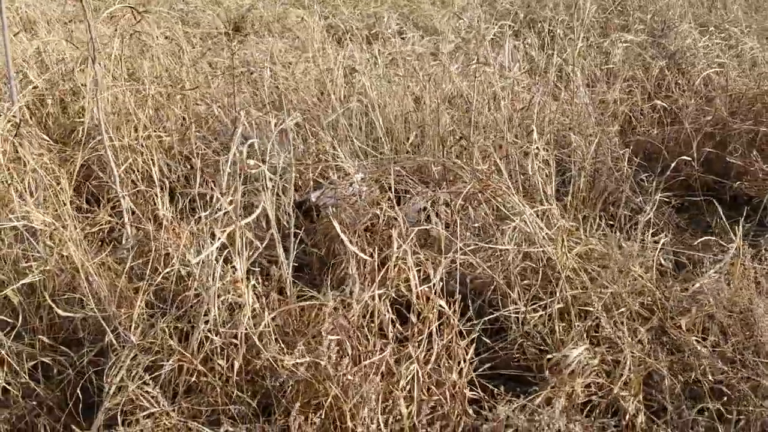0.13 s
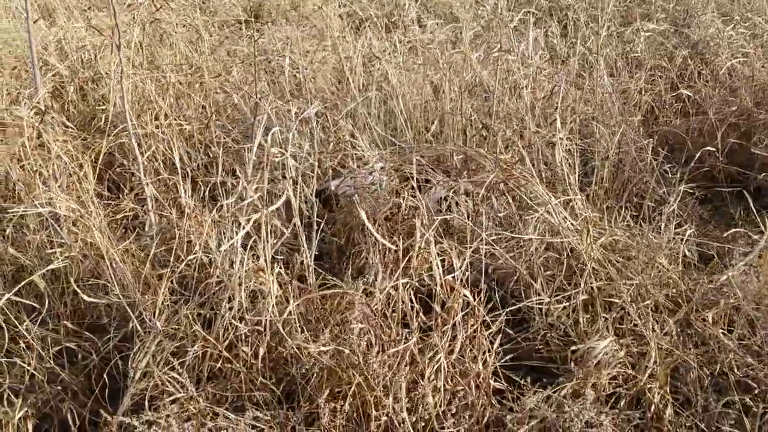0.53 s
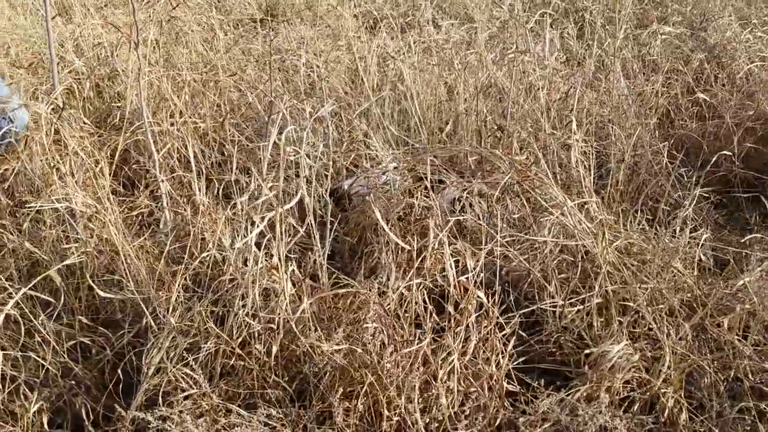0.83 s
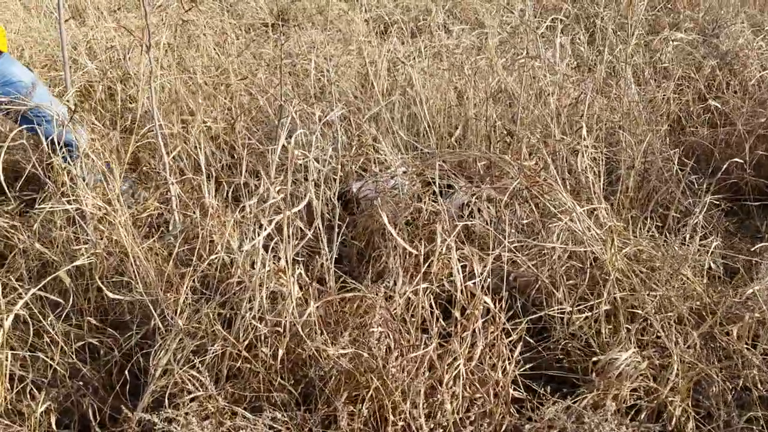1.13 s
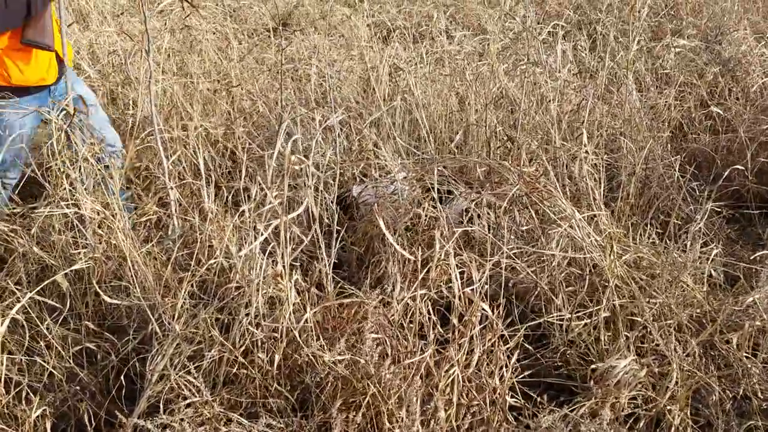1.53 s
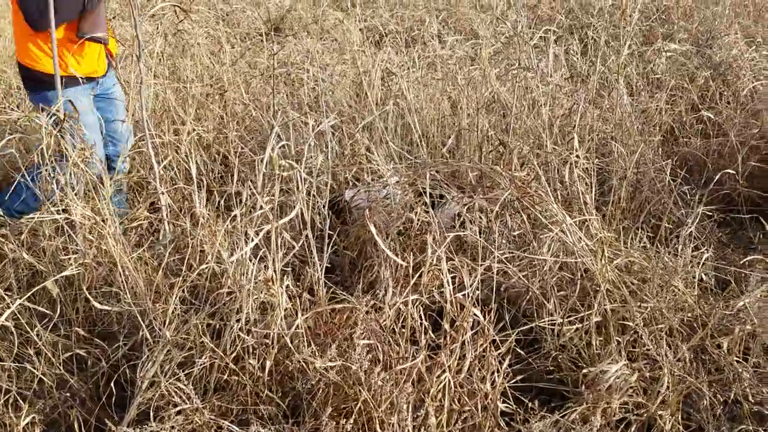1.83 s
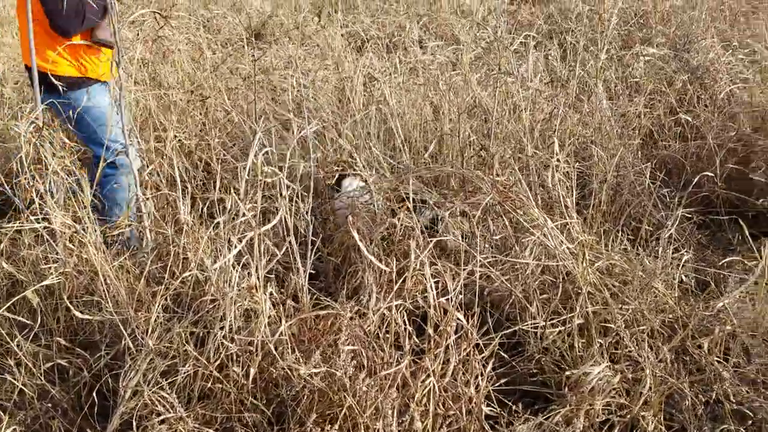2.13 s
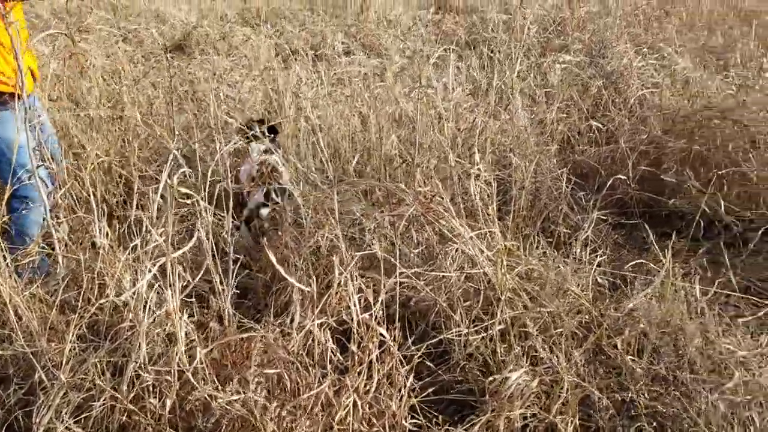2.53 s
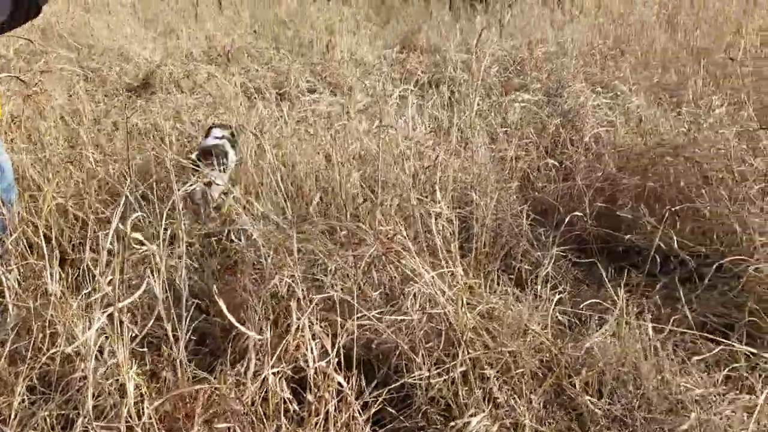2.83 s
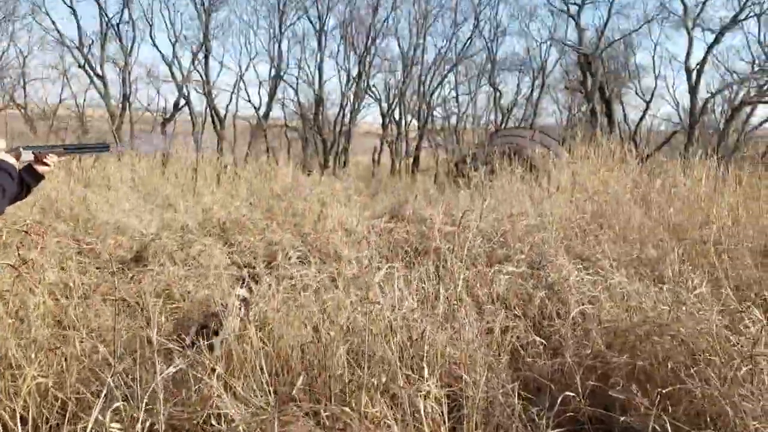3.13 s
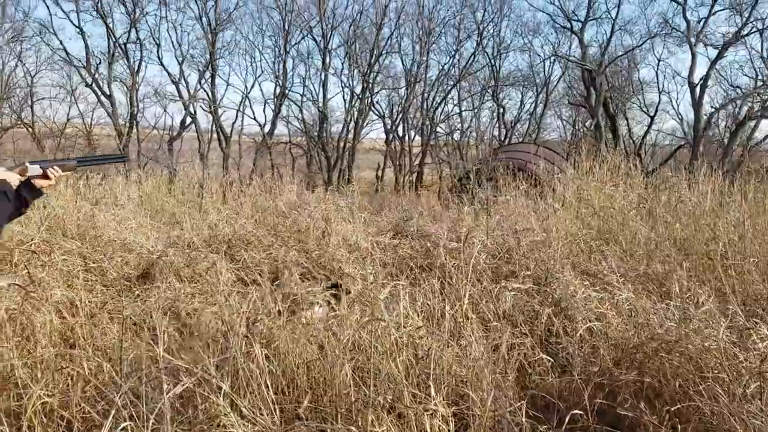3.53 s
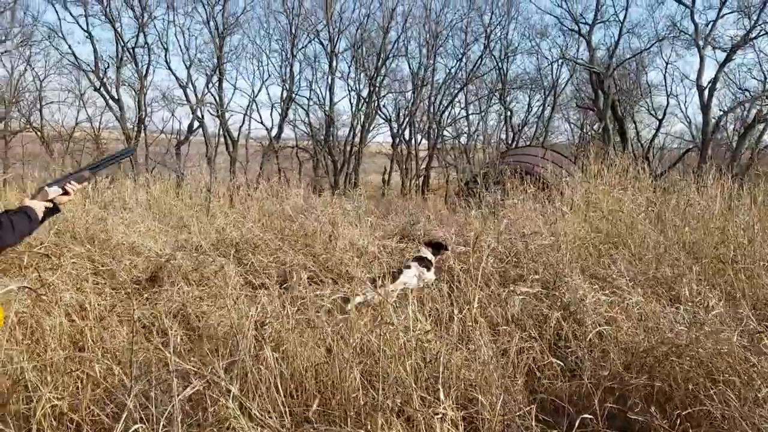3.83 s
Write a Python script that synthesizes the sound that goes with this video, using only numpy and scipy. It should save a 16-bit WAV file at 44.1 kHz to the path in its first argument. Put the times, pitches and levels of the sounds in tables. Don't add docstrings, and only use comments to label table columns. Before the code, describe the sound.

Loud close shotgun shot near the end, with rough scattered echoes rolling back from a treeline. Earlier, crisp grass rustling and stalk snaps, then fluttering wingbeats fading away, outdoors on a small stereo microphone.

```python
import sys
import numpy as np
from scipy import signal
from scipy.fft import rfft, irfft
from scipy.io import wavfile
from scipy.ndimage import uniform_filter1d

SR = 44100
rng = np.random.default_rng(int(sys.argv[2]) if len(sys.argv) > 2 else 0)


def inscribe(sig):
    pcm = np.round(np.clip(np.atleast_2d(sig).T, -1, 1) * 32767)
    wavfile.write(sys.argv[1], SR, pcm.astype(np.int16))


def magnitude_from_level(level_db):
    exponent = np.asarray(level_db, float) / 20
    return 10 ** exponent


N = 176400
RIGHT_LATE_S = 0.00018


def evened(x):
    return x / np.sqrt(np.mean(x ** 2) + 1e-20)


def steadied(x, span_s):
    power = uniform_filter1d((x ** 2).mean(0), round(span_s * SR))
    return x / np.sqrt(abs(power) + 0.0198)


def read(points, hz):
    f, value = np.transpose(points)
    return np.interp(np.log(hz + 1), np.log(f + 1), value)


def add(mix, s, sound):
    part = mix[:, round(s * SR):][:, :sound.shape[1]]
    part += sound[:, :part.shape[1]]


def sides(db):
    return magnitude_from_level([[db / 2], [-db / 2]])


def grains(per_s, spread_db):
    size = magnitude_from_level(spread_db * np.minimum(rng.exponential(1, (2, N)), 5))
    sign = rng.choice([-1, 1], (2, N))
    return size * sign * (rng.random((2, N)) < per_s / SR)


def burst(hz, turns, sag=0):
    u = np.arange(0, turns / hz, 1 / SR) * hz / turns
    return np.sin(np.pi * u) ** 1.25 * np.sin(2 * np.pi * turns * u * (1 + sag * (1 - u)))


def hump(u, at, rise, fall):
    return np.where(u < at, np.exp(-((u - at) / rise) ** 2), np.exp(-abs(u - at) / fall))


def near_path(hz, t):
    # start_s, path_stretch, close_share (0-1), treble_share (0-1), notch_hz
    walker = [(0, 1.02, .8, .6, 3250), (.45, .98, .9, 1, 3100), (.75, 1.02, .9, 1, 2800),
              (.9, .98, 1, 1, 2700), (1.1, 1.02, 1, .55, 2650), (1.25, .98, .95, .4, 2650),
              (1.5, 1.07, .95, .5, 2600), (1.85, .94, .9, .9, 2550), (2.05, .97, .55, .3, 2600),
              (2.6, .97, .55, .3, 2750), (2.8, .97, .95, .3, 2950), (3.2, .95, 1, .3, 3000),
              (3.3, .95, .4, .3, 3000)]
    # pitch_hz, left_right_likeness (0-1)
    near_likeness = [(60, .9), (700, .75), (1750, .95), (2400, .75), (3300, .85), (5000, .93), (6500, .75),
                     (9000, .15)]
    # pitch_hz, right_lag_turns
    near_turns = [(1, 0), (1750, .5), (3300, 1.5), (5200, 2.5), (7500, 3.5), (16000, 7)]
    s, stretch, share, treble, notch_hz = np.transpose(walker)
    f, turns = np.transpose(near_turns)
    share = np.interp(t, s, share)
    high = np.interp(hz, [3700, 4600], [0, 1])
    lag = np.exp(-2j * np.pi * np.interp(hz * np.interp(t, s, stretch), f, turns))
    notch_width_hz, notch_db = 200, -16
    dip = np.exp(-((hz - np.interp(t, s, notch_hz)) / notch_width_hz) ** 2)
    notch = magnitude_from_level(notch_db * share ** 2 * dip)
    likeness = (1 - high) * share + high * np.interp(t, s, treble)
    return read(near_likeness, hz) * likeness, lag, notch


def colour(x, spectrum, patchy_db=0., flicker_db=0., like=0., lean=1.0, late=0.79, housing=0.21,
           extra=None, alike=None, near=False):
    # pitch_hz, width_hz, level_db
    ports = [(1900, 130, -4), (2250, 250, 3), (4200, 600, 2)]
    # pitch_hz, left_over_right_db
    leaning = [(60, -1), (700, 3), (1750, 5), (2400, 3), (4400, -2.2), (8100, 12), (12000, 36),
               (15000, -0.5)]
    # pitch_hz, left_right_likeness (0-1)
    usual_likeness = [(60, 1), (300, 0.62), (700, 0.71), (1400, 0.062), (3000, 0.05), (7000, 0.014)]
    hz, t, z = signal.stft(x, SR, nperseg=256)

    field = rng.standard_normal((len(t), len(hz))).T
    quick = evened(uniform_filter1d(uniform_filter1d(field, size=5, axis=0), size=24, axis=1))
    slow = evened(uniform_filter1d(uniform_filter1d(field[::-1], size=9, axis=0), size=150, axis=1))
    flicker = evened(uniform_filter1d(rng.standard_normal(len(t)), size=9))

    if near:
        same, lag, notch = near_path(hz[:, None], t)
    else:
        likeness = usual_likeness if alike is None else alike
        same = np.clip(read(likeness, hz) + like, -1, 1)[:, None]
        lag, notch = np.exp(-2j * np.pi * hz * late * RIGHT_LATE_S)[:, None], 1
    right = notch * (same * z[0] * lag + np.sqrt(1 - same ** 2) * z[1])
    tilt = lean * read(leaning, hz)[:, None] / 2
    z = np.array([z[0], right]) * magnitude_from_level([tilt, -tilt])

    resonance = housing * sum(db * np.exp(-((hz - f) / w) ** 2) for f, w, db in ports)
    steady_db = (read(spectrum, hz) + resonance)[:, None]
    level = magnitude_from_level(steady_db + patchy_db * (quick + slow) + flicker_db * flicker)
    scale = np.sqrt(np.mean(signal.istft(z * level, SR, nperseg=256)[1] ** 2))
    if extra:
        level = level * magnitude_from_level(extra(hz[:, None], t))
    return signal.istft(z * level, SR, nperseg=256)[1][:, :N] / scale


def grass():
    # start_s, stirring_db, finer_blades_db
    rustle = [(0, -47, 3), (.1, -50.5, 5), (.34, -48.5, 3), (.4, -54, 7), (.62, -53.5, 5.5),
              (.74, -50.5, 6.5), (.9, -55.5, 9.5), (1.04, -46.5, 2.5), (1.22, -49, 5.5), (1.33, -57, 8.5),
              (1.5, -51.5, 6.5), (1.63, -61, 7), (1.9, -56.5, 12), (2.0, -48.5, 4), (2.3, -50, 4.5),
              (2.6, -47.5, 4.5), (2.7, -55.5, 11), (3.2, -55, 8.5)]
    # pitch_hz, level_db (per Hz)
    fizz_spectrum = [(5000, -14.5), (7800, -11.5), (9500, -5.5), (12000, -17.5), (14500, 8), (16200, 2)]
    # pitch_hz, level_db (per Hz)
    stem_spectrum = [(100, -20), (200, -16), (900, -5), (2200, -2.5), (4800, -1), (8000, -9), (12000, -25)]
    # pitch_hz, level_db (per Hz)
    air_spectrum = [(30, -4), (170, -3.5), (1000, -3), (1700, -8), (4700, -29), (7800, -25), (10000, -14.5),
                    (15000, -7.5)]
    stems_db, air_db = 2.5, -50.5
    t = np.arange(N) / SR
    s, stir_db, fine_db = np.transpose(rustle)
    hiss = rng.standard_normal((3, 2, N))
    blades = hiss[0] + .45 * evened(grains(900, 3.5))
    fizz = colour(blades, fizz_spectrum, patchy_db=1.3, flicker_db=1., near=True)
    rubbing = hiss[1] + .45 * evened(grains(500, 3.3))
    stems = colour(rubbing, stem_spectrum, patchy_db=.9, flicker_db=1.2, near=True)
    air = colour(hiss[2], air_spectrum, patchy_db=.9, flicker_db=.5, near=True)
    stir = magnitude_from_level(np.interp(t, s, stir_db) + 3.0)
    fine = magnitude_from_level(np.interp(t, s, fine_db))
    return stir * (fine * fizz + magnitude_from_level(stems_db) * stems) + magnitude_from_level(air_db) * air


def wind():
    # pitch_hz, level_db (per Hz)
    wind_spectrum = [(20, -1.5), (45, -4), (75, 4), (120, -10.5), (250, -33), (600, -19.5)]
    air = rng.standard_normal((2, N))
    lumps = magnitude_from_level(3.5 * evened(uniform_filter1d(air[0, ::-1], size=4000)))
    tone = magnitude_from_level(read(wind_spectrum, np.fft.rfftfreq(N, 1 / SR)))
    rumble = evened(irfft(rfft(air) * tone, N))
    return magnitude_from_level(-58) * lumps * rumble * sides(5.3)


def snaps():
    # start_s, peak_db, ring_hz, ring_turns
    stalks = [(.219, -33.5, 1400, 1.9), (.359, -37, 527, 1.35), (0.359, -36.5, 3700, 8.7),
              (0.492, -24, 6200, 0.91), (0.643, -18, 12000, 1.3), (0.645, -41, 4000, 5.6),
              (.731, -37, 4070, 8.3), (0.7313, -27, 6960, 1.8), (.533, -44, 3480, 4),
              (.808, -37, 3760, 5.7), (1.375, -30, 11000, 1.2), (1.776, -37, 11000, 1.4),
              (1.809, -23.5, 9800, 1.46), (2.119, -18.5, 5850, 0.98)]
    out = np.zeros((2, N))
    for s, db, hz, turns in stalks:
        add(out, s, magnitude_from_level(db) * sides(8.4) * burst(hz, turns))
    return out


def wings():
    # start_s, peak_db, pitch_hz
    claps = [(2.034, -45, 694), (2.065, -40.5, 664), (2.107, -36, 980), (2.15, -32.5, 890),
             (2.193, -32.5, 830), (2.234, -36.5, 830), (2.274, -36.5, 864), (2.315, -37, 800),
             (2.357, -42.5, 780), (2.398, -38.5, 785), (2.441, -38, 785), (2.478, -47, 730),
             (2.521, -39.5, 810), (2.565, -40, 850), (2.605, -39.5, 950), (2.647, -42.5, 970),
             (2.732, -44, 1020), (2.772, -47.5, 850), (2.814, -46.5, 990)]
    # start_s, peak_db, pitch_hz
    flicks = [(2.028, -41, 630), (2.042, -39.5, 750), (2.084, -42, 660), (2.119, -40, 1240),
              (2.254, -44, 640), (2.346, -51, 615), (2.457, -44, 716), (2.49, -56, 840), (2.892, -61, 660),
              (3.144, -53, 1010), (3.158, -50, 990), (3.198, -43, 970)]
    # start_s, level_db
    throb = [
        (1.95, -87),
        (2.05, -60),
        (2.4, -60),
        (2.44, -73),
        (2.5, -68),
        (2.7, -68),
        (2.75, -77),
        (2.9, -72),
    ]
    # beat_multiple, level_db
    throb_orders = [(2, -23), (3, 3.5), (4, -4), (5, -7)]
    beat_hz, clap_db, clap_turns = 24.0, 1, 4.7
    swish_db, swish_s, wash_db = -13.5, 0.033, -7
    t = np.arange(N) / SR
    out, puffs = np.zeros((2, N)), np.zeros((2, N))

    puff = np.exp(-np.arange(4000)[None] / SR / swish_s)
    for s, db, hz in claps:
        add(out, s - .001, magnitude_from_level(db + clap_db) * sides(1.5) * burst(hz, clap_turns, .22))
        other_s = s - .002 * (.5 + rng.random())
        add(out, other_s, magnitude_from_level(db + clap_db - 6) * burst(hz * 1.3, clap_turns)[None])
        add(puffs, s - .004, magnitude_from_level(db + swish_db) * puff)
    for s, db, hz in flicks:
        add(out, s - .002, magnitude_from_level(db + clap_db) * sides(1.7) * burst(hz, 4.36))
    out[1] = np.roll(out[1], round(RIGHT_LATE_S * SR))

    add(puffs, 1.966, magnitude_from_level(-49) * np.hanning(round(0.12 * SR))[None] ** 0.059)
    swish_spectrum = [(200, -2), (500, -7.5), (800, -4.5), (1300, -7.5), (4000, -22.5)]
    swish = colour(rng.standard_normal((2, N)), swish_spectrum, patchy_db=1.5, like=0.27)

    s, db = np.transpose(throb)
    effort = uniform_filter1d(magnitude_from_level(np.interp(t, s, db, -120, -120)), size=900)
    beat = sum(magnitude_from_level(d + 4.0) * np.sin(2 * np.pi * (k * beat_hz * t + rng.random()))
               for k, d in throb_orders)
    drift = signal.detrend(uniform_filter1d(abs(swish[0]), size=2500))
    waver = magnitude_from_level(3 * evened(drift))
    return out + (puffs + magnitude_from_level(wash_db) * effort) * swish + sides(1.4) * effort * beat * waver


def blast(u):
    # pitch_hz, level_db (per Hz)
    blast_spectrum = [(100, -41), (300, 3), (700, -8), (1500, 7.5), (2700, -9.5), (4100, -1.5), (9000, -27),
                      (15000, -33)]
    blast_db, blast_s, lead_db, lead_s = -7, .0042, -26, .006
    noise = colour(rng.standard_normal((2, N)), blast_spectrum, like=-0.031, lean=0)
    front = magnitude_from_level(blast_db) * (u > 0) * np.exp(-(u / blast_s) ** 4) * sides(-0.64)
    lead = magnitude_from_level(lead_db) * np.clip(1 + u / lead_s, 0, 1) * (u < 0)
    late = magnitude_from_level(-6.5) * hump(u, .0072, 0.00093, 0.0018) * [[1], [.3]]
    return steadied(noise, 0.002) * (front + lead + late)


def ground_thuds():
    # start_s, peak_db, pitch_hz, ring_turns
    thuds = [
        (3.257, -25, 135, 3.3),
        (3.303, -24, 316, 9),
        (3.385, -33.5, 110, 2.5),
        (3.455, -43.5, 125, 4.8),
    ]
    out = np.zeros((2, N))
    for s, db, hz, turns in thuds:
        add(out, s, magnitude_from_level(db) * sides(3.5) * burst(hz, turns))
    return out


def grass_scatter(u, shot_s):
    # pitch_hz, level_db (per Hz)
    scatter_spectrum = [(60, -28), (130, -7.5), (250, -3), (800, -3), (2000, -2), (6500, -13),
                        (10000, -22.5), (15000, -11)]
    # pitch_hz, fall_db (per s)
    scatter_fall = [(130, 164.5), (260, 109.5), (800, 60), (2200, 60), (5000, 77), (8000, 96.5),
                    (15000, 152)]
    # pitch_hz, left_right_likeness (0-1)
    shot_likeness = [(60, .1), (150, 0.45), (300, 0.45), (700, 0.46), (1400, 0.21), (3000, 0.098),
                     (7000, .05)]
    # peak_s, width_s, level_db
    thickets = [
        (3.268, 0.011, 2),
        (3.283, 0.0036, -3),
        (3.299, 0.0046, 2.5),
        (3.311, 0.0043, 0.5),
        (3.319, .003, 5.5),
        (3.334, 0.0054, 1),
        (3.352, 0.0089, 3.5),
        (3.4, .008, 0.5),
    ]

    def fall(hz, t):
        return -read(scatter_fall, hz) * np.clip(t - shot_s, 0, None)

    noise = rng.standard_normal((2, N)) + 0.46 * evened(grains(3000, 2.0))
    scatter = colour(noise, scatter_spectrum, patchy_db=1.37, flicker_db=0.45, like=-0.067, lean=0.22,
                     housing=0.13, extra=fall, alike=shot_likeness)
    reach_db = np.maximum(-280 * np.clip(u - (3.41 - shot_s), 0, None), -7)
    growth_db = sum(db * hump(u, s - shot_s, w, w) for s, w, db in thickets)
    return scatter * magnitude_from_level(-12 + reach_db + growth_db) * np.clip(u / 0.00084, 0, 1)


def tree_echoes(u, shot_s):
    # pitch_hz, level_db (per Hz)
    tree_spectrum = [(240, -38.5), (380, -8.5), (640, -3), (1000, -8), (1400, -13), (3400, -19.5),
                     (9000, -58.5)]
    # arrival_s, swell_s, fade_s, level_db
    stands = [(3.34, 0.0053, 0.0071, -16), (3.356, 0.017, 0.03, -14), (3.37, 0.0042, 0.0082, -11),
              (3.381, 0.0027, 0.0041, -4.5), (3.393, 0.0026, 0.017, -12), (3.425, 0.014, 0.004, -17),
              (3.438, .004, .008, -28.5), (3.456, 0.0081, 0.014, -22), (3.489, .012, 0.028, -32),
              (3.518, 0.0085, 0.017, -32.5), (3.543, 0.0031, 0.0069, -28), (3.56, 0.001, 0.003, -27),
              (3.573, .005, 0.0047, -31.5), (3.62, 0.053, 0.04, -44.5), (3.674, 0.011, 0.012, -42.5),
              (3.74, 0.042, 0.031, -48), (3.765, 0.0015, 0.0021, -38), (3.8, 0.032, 0.057, -50.5),
              (3.99, 0.033, .02, -54.5)]

    def dull(hz, t):
        return -22 * np.log2(np.maximum(hz / 1000, 1)) * np.clip(t - 3.38, 0, None)

    trunks = colour(grains(1500, 1.5), tree_spectrum, patchy_db=2.8, like=0.062, lean=0.63, late=0.43,
                    housing=0.28, extra=dull)
    trunks = signal.sosfilt(signal.butter(4, 290, "high", fs=SR, output="sos"), trunks)
    power = sum((magnitude_from_level(db) * hump(u, s - shot_s, rise, fade)) ** 2 for s, rise, fade, db in stands)
    return steadied(trunks, 0.0032) * np.sqrt(power)


def shot(shot_s):
    u = np.arange(N) / SR - shot_s
    sound = blast(u) + ground_thuds() + grass_scatter(u, shot_s) + tree_echoes(u, shot_s)
    return signal.sosfilt(signal.butter(3, 85, "high", fs=SR, output="sos"), sound)


def scene():
    t = np.arange(N) / SR
    shot_s = 3.2475
    duck_db = -2 * (t > shot_s) - 10 * np.clip((t - 3.71) / 0.014, 0, 1)
    field = (grass() + snaps() + wings()) * magnitude_from_level(duck_db)
    return field + wind() * magnitude_from_level(0.58 * duck_db) + shot(shot_s)


def top_cut(x):
    return signal.sosfilt(signal.butter(12, 16800, fs=SR, output="sos"), x)


def record(dry):
    ceiling, edge_hz = 0.99, 15850
    overloaded = ceiling * np.tanh(dry / ceiling)
    edge = signal.firwin(1201, edge_hz, window=("kaiser", 8), fs=SR)
    finished = signal.oaconvolve(overloaded, edge[None], "same")
    return top_cut(finished)


dry = scene()
out = record(dry)
inscribe(out)
```